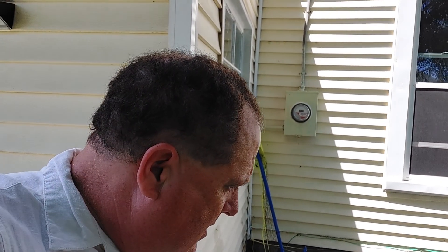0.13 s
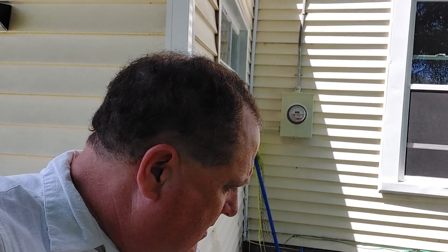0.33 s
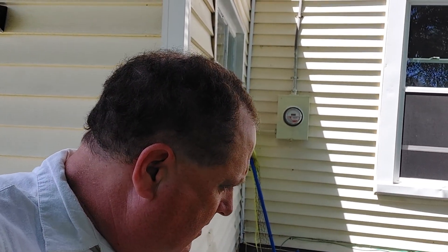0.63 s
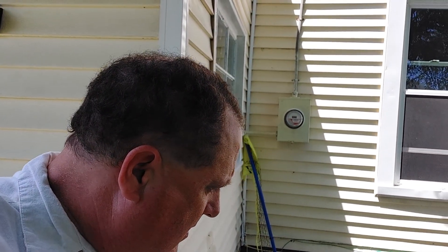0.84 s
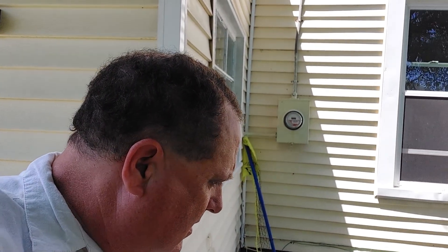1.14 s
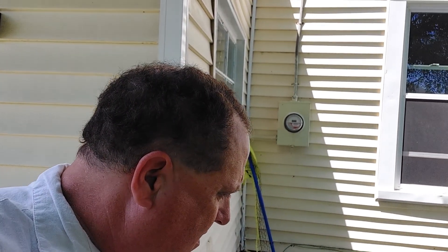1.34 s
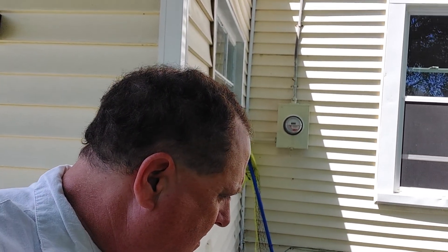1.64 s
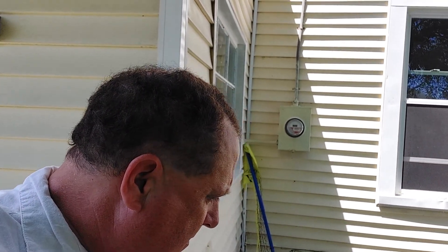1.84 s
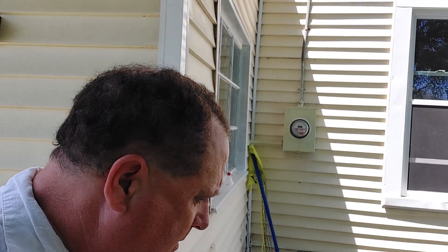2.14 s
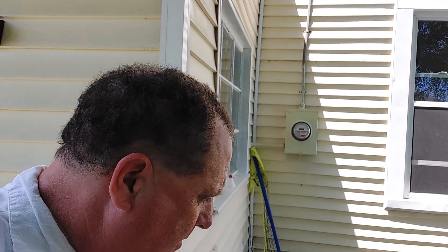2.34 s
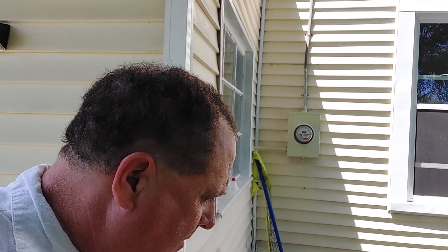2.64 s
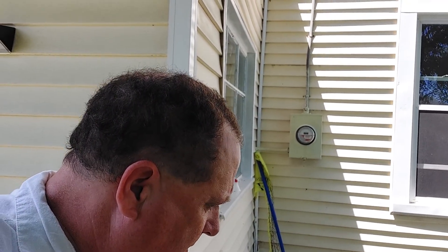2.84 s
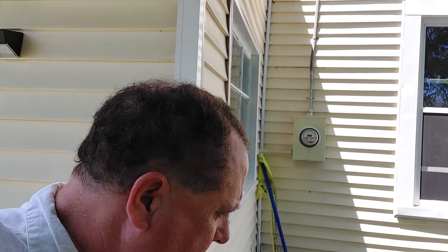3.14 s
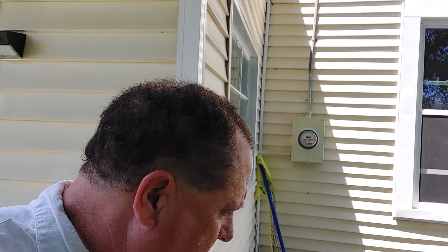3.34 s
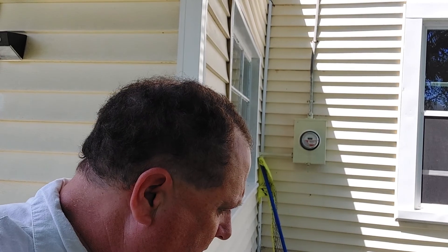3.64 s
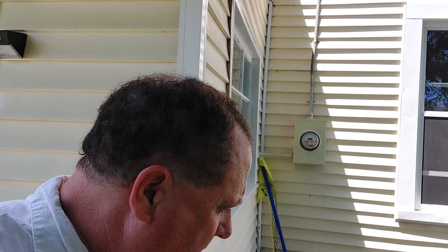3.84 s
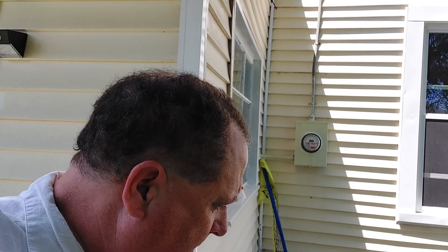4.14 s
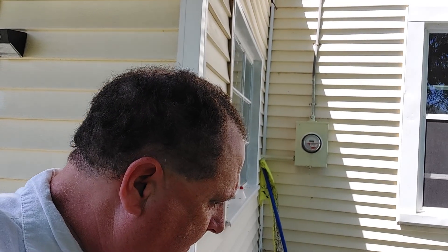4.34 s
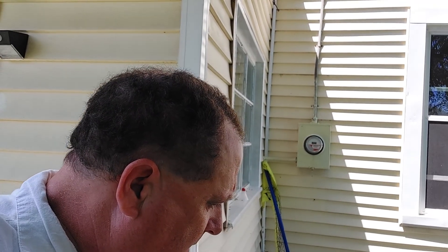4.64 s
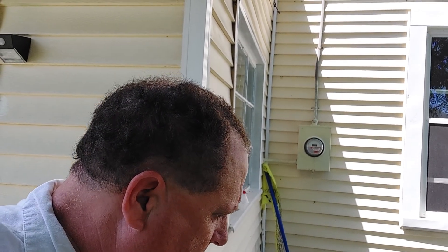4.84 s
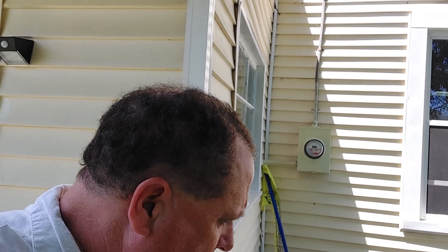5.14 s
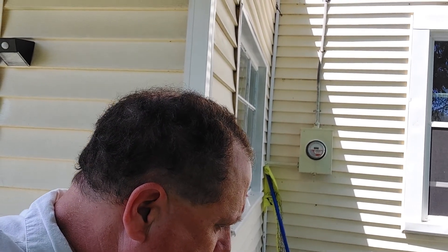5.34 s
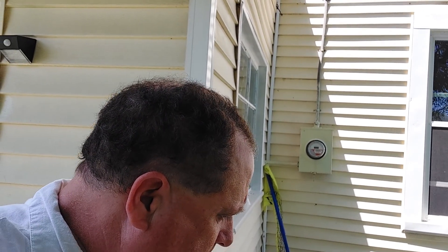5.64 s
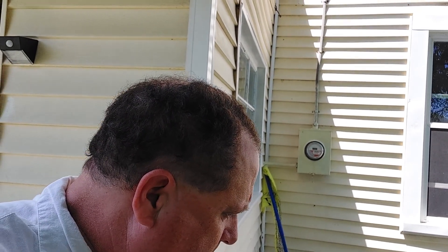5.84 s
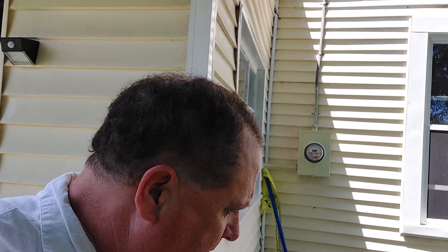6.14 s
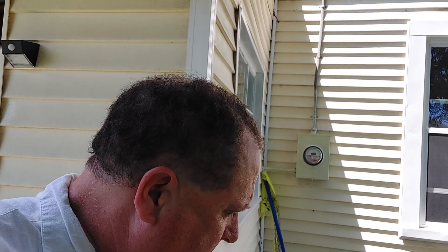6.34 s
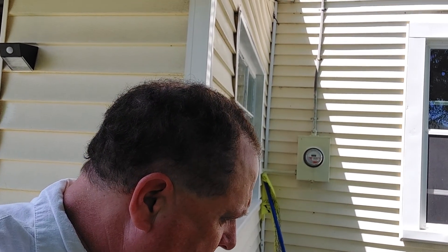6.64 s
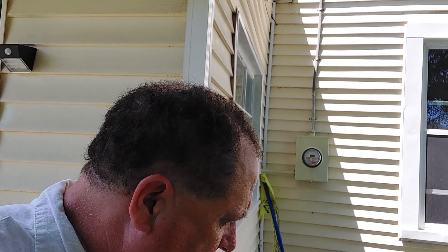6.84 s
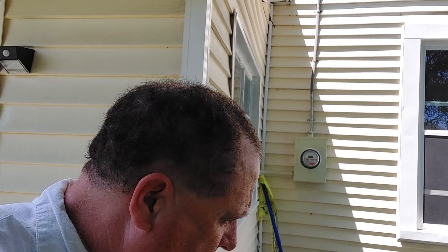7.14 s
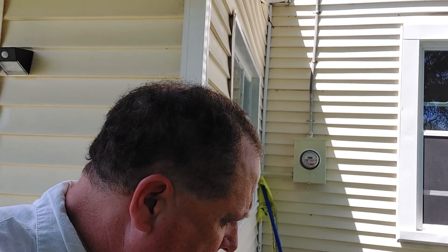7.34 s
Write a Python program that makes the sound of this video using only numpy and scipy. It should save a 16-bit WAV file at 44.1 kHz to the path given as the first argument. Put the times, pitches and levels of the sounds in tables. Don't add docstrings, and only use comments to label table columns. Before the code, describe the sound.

Close, bright stereo sound in a quiet yard. Weak fizz and tiny ticks come first, with a faint far bird chirp. Meat rubs and drags across foil, then boiling fat rushes up with dense hiss, sharp spits and watery pops. The hollow grill bowl knocks and rumbles beneath. The sizzle slowly thins but never stops, over a low wavering drone.

```python
import sys
import numpy as np
from scipy import signal
from scipy.fft import rfft, irfft, next_fast_len
from scipy.io import wavfile
from scipy.ndimage import uniform_filter1d

SR = 44100
rng = np.random.default_rng(int(sys.argv[2]) if len(sys.argv) > 2 else 0)


def wav_out(sig):
    wavfile.write(sys.argv[1], SR, np.round(np.clip(np.atleast_2d(sig).T, -1, 1) * 32767).astype(np.int16))


def decibels_to_gain(level_db):
    exponent = np.asarray(level_db, float) / 20
    return 10 ** exponent


N = 329868
LEFT_LAG = 6


def read(points, hz):
    f, value = np.transpose(points)
    return np.interp(np.log(hz + 1), np.log(f + 1), value)


def curve(rows, column=1):
    rows = np.asarray(rows)
    return np.interp(np.arange(N) / SR, rows[:, 0], rows[:, column])


def swells(rows):
    t = np.arange(N) / SR
    return sum(db * np.maximum(1 - abs(t - s) / max(half, .005), 0) for s, db, half in rows)


def evened(x):
    return x / np.sqrt(np.mean(x ** 2))


def add(mix, s, sound):
    part = mix[round(s * SR):][:len(sound)]
    part += sound[:len(part)]


def shaped(x, gain):
    size = next_fast_len(N)
    return irfft(rfft(x, size) * gain(np.fft.rfftfreq(size, 1 / SR)), size)[..., :N]


def low_cut(corner_hz, power):
    return lambda hz: 1 / np.sqrt(1 + (corner_hz / (hz + 1)) ** power)


def high_cut(corner_hz, power):
    return lambda hz: 1 / np.sqrt(1 + (hz / corner_hz) ** power)


def humps(modes, steep=0.98):
    return lambda hz: np.sqrt(sum(decibels_to_gain(db) ** 2 / (1 + (2 * (hz - f) / w) ** 2) ** steep for f, w, db in modes))


def patchy(patchy_db, wide, long):
    z = signal.stft(rng.standard_normal((2, N)), nperseg=256, noverlap=128)[2]
    patches = uniform_filter1d(rng.standard_normal(z.shape[1:]), wide, 0)
    patches = evened(uniform_filter1d(patches, long // 2, 1))
    noise = signal.istft(z * decibels_to_gain(patchy_db * patches), nperseg=256, noverlap=128)[1]
    return evened(noise[:, :N])


def bubbles(per_s, spread_db, t60_ms):
    size_db = spread_db * np.minimum(rng.exponential(1, N), 2.8)
    starts = decibels_to_gain(2 * size_db) * (rng.random(N) < per_s / SR)
    fade = decibels_to_gain(-120e3 / SR / t60_ms)
    swell = decibels_to_gain(-120e3 / SR / (0.69 * t60_ms))
    power = signal.lfilter([1], [1, -fade], starts)
    power = signal.lfilter([1], [1, -swell], power[::-1])[::-1]
    return power / power.mean()


# pitch_hz [Hz], level_db [dB per Hz]
YARD = [(88, -39), (150, -7), (235, 4), (292, -25), (362, -5), (387, -14), (1200, -20), (1730, -14.5),
        (8000, -43.5), (10400, -79), (17600, -120)]


def yard():
    air = shaped(rng.standard_normal((2, N)), lambda hz: decibels_to_gain(read(YARD, hz)))
    return decibels_to_gain(-53.5) * evened(air)


# time_s [s], level_db [dB]
DRONE = [(0, -44.5), (.25, -39), (.8, -38), (1.5, -37.5), (1.75, -40), (2.25, -34.5), (2.7, -41),
         (3.3, -37.5), (3.9, -35.5), (4.2, -38), (4.55, -42.5), (5.7, -41), (6.4, -45), (7.1, -45),
         (7.31, -51.5), (7.48, -43.5)]
# time_s [s], change_db [dB], half_length_s [s]
GUSTS = [(.62, 2, 0.046), (.82, 10, 0.024), (.98, -6, 0.039), (1.04, 4, 0.045), (1.15, 8.5, 0.041),
         (1.19, -5.5, 0.099), (1.46, 2.5, 0.068), (1.6, -3, 0.086), (1.67, 4.5, 0.034), (2.23, 1, 0.032),
         (2.32, -2, 0.043), (2.36, 6.5, 0.023), (2.48, -5, 0.04), (2.57, 0, 0.067), (5.95, 0, .12),
         (2.73, -3, 0.072), (2.89, 7.5, 0.053), (3.31, 5, 0.025), (3.46, -7.5, 0.078), (3.56, 4.5, 0.11),
         (3.64, -5, 0.067), (3.75, 3, 0.1), (3.81, -9, 0.035), (3.86, 7, 0.043), (3.92, -6, .03),
         (4.1, -10, 0.045), (4.75, -5, 0.13), (4.85, 5, 0.14), (5.33, -5, 0.06), (5.65, 6, 0.032),
         (6.17, 7.5, 0.092), (6.41, 6, 0.027)]
# pitch_hz [Hz], width_hz [Hz], level_db [dB]
HUMS = [(52.4, 10, -33), (68, 35, -1), (87.06, 1.5, 1), (122, 16, -5.5), (143.5, 3.8, -5.5)]


def drone():
    hums, rumble_cut = humps(HUMS, steep=1.4), low_cut(33, 4)
    noise = shaped(rng.standard_normal((2, N)), lambda hz: hums(hz) * rumble_cut(hz))
    return decibels_to_gain(curve(DRONE) + swells(GUSTS) + 0.5) * evened(noise)


# start_s [s], length_s [s], level_db [dB], start_hz [Hz], end_hz [Hz]
CHIRPS = [
    (0.086, .035, -59, 3140, 2950),
    (0.122, 0.046, -61, 2700, 2910),
    (1.345, .05, -58, 2650, 2800),
]


def bird():
    out = np.zeros(N)
    for s, length, db, start_hz, end_hz in CHIRPS:
        along = np.arange(0, 1, 1 / (length * SR))
        pitch_hz = start_hz + (end_hz - start_hz) * along
        whistle = np.sin(np.pi * along) * np.sin(2 * np.pi * np.cumsum(pitch_hz) / SR)
        add(out, s, decibels_to_gain(db) * whistle)
        add(out, s + 0.0167, decibels_to_gain(db - 4.0) * whistle)
    return out * decibels_to_gain([[1.5], [-1.5]])


# time_s [s], level_db [dB], ridge_hz [Hz]
SLIDE = [
    (.48, -84, 2000),
    (.6, -57.5, 2150),
    (.72, -55, 2470),
    (.85, -52.5, 2600),
    (.97, -62, 2470),
    (1.07, -54, 2400),
    (1.2, -85, 2400),
]


def slide():
    noise = patchy(1.8, wide=2, long=16)
    turn = np.exp(2j * np.pi * np.cumsum(curve(SLIDE, column=2)) / SR)
    keep = np.exp(-np.pi * 600 / SR)
    ridge = evened((turn * signal.lfilter([1], [1, -keep], noise / turn)).real)
    rustle = evened(shaped(noise, humps([(3330, 400, 4), (4750, 1800, -4)], steep=1.6)))
    both = decibels_to_gain(curve(SLIDE)) * (ridge + decibels_to_gain(-9.5) * rustle)
    return np.array([both[0], 0.37 * both[0] + 0.6 * both[1]])


# start_s [s], peak_db [dB], hold_s [s]
PULLS = [
    (1.069, -44.5, 0.051),
    (1.185, -49, 0.02),
    (1.28, -64, 0.14),
    (1.46, -61, .008),
]
PULL_RISE_S, PULL_FADE_DB_PER_S = 0.016, 193


def scrape():
    pulls, t = np.zeros(N), np.arange(SR // 2) / SR
    for s, db, hold in PULLS:
        fade_db = PULL_FADE_DB_PER_S * np.maximum(t - hold, 0)
        add(pulls, s, np.minimum(t / PULL_RISE_S, 1) * decibels_to_gain(db - fade_db))
    foil = shaped(patchy(2.3, wide=3, long=10), humps([(1105, 110, 16), (1940, 2500, 1.5), (4500, 4900, -18)]))
    grain = np.sqrt(3.3 + 0.8 * bubbles(230, 1.8, 24.0))
    return decibels_to_gain(-1.0) * pulls * evened(foil) * grain


# start_s [s], peak_db [dB], pitch_hz [Hz], t60_ms [ms]
KNOCKS = [(1.073, -43, 300, 50), (1.197, -34, 1960, 45), (1.212, -35, 1820, 45), (1.329, -32, 350, 43),
          (1.546, -35.5, 400, 61), (1.747, -28, 392, 37), (1.868, -31, 600, 32), (2.41, -27, 555, 100),
          (2.71, -28, 560, 60), (3.09, -25.5, 550, 80), (2.333, -29, 398, 65), (2.633, -29, 420, 54),
          (3.001, -35, 373, 43), (3.056, -28, 308, 73), (3.155, -27.5, 304, 120), (3.21, -31, 408, 250),
          (3.566, -24, 377, 26), (3.679, -30, 260, 57), (3.787, -21.5, 557, 57), (3.872, -31.5, 396, 37),
          (3.895, -23, 560, 73), (4.066, -28, 536, 39), (4.141, -27.5, 520, 49), (4.234, -30, 415, 32),
          (4.665, -23, 255, 47), (6.016, -32, 585, 52), (6.041, -30, 495, 34), (7.034, -30.5, 426, 43)]


def knocks():
    out, t = np.zeros(N), np.arange(6000) / SR
    for s, db, hz, t60 in KNOCKS:
        ring = np.sin(2 * np.pi * hz * t)
        ring = ring + .5 * np.sin(2 * np.pi * 883 * t) + 0.36 * np.sin(2 * np.pi * 390 * t)
        add(out, s, decibels_to_gain(db - 10.0 - 64000.0 * t / max(t60, 5)) * ring)
    return out


# time_s [s], level_db [dB]
STIR = [(0, -59.5), (1.02, -50.5), (1.3, -47), (1.5, -52), (2.12, -43), (3.0, -42.5), (3.6, -45.5),
        (4.0, -43.5), (4.5, -45), (5.2, -46.5), (7.0, -55), (7.17, -45), (7.35, -56.5), (7.48, -51)]
# time_s [s], change_db [dB], half_length_s [s]
JOSTLES = [(1.07, 5.5, 0.039), (1.42, 6, 0.03), (2.19, -5, 0.11), (2.265, 7, 0.035), (2.3, -10, 0.047),
           (2.42, 8.5, 0.092), (2.71, 4.5, 0.061), (3.08, 5.5, 0.12), (3.23, 7.5, 0.029), (3.42, -2, 0.028),
           (3.58, 8, 0.0063), (3.81, -7, 0.08), (4.61, -9.5, 0.085), (4.66, 8.5, 0.037), (5.25, 4.5, 0.087),
           (7.04, 8, 0.055), (7.15, -4, 0.04), (6.37, -6, 0.069), (6.93, -4, .05)]
# pitch_hz [Hz], width_hz [Hz], level_db [dB]
BOWL = [(246, 37, 1.5), (308, 51, -2.5), (400, 73, -2), (560, 61, -1), (883, 58, -7)]


def bowl():
    stir_db = curve(STIR) + swells(JOSTLES)
    stirring = patchy(3.06, wide=2, long=10) * np.sqrt(0.66 + 0.3 * bubbles(23, 0.92, 150.0))
    hollow = evened(shaped(stirring, humps(BOWL, steep=0.95)))
    rattle = evened(shaped(stirring, humps([(1170, 460, 0)], steep=4.3)))
    rattle_db = 2.7 * (stir_db + 40.5) - 59.5
    return decibels_to_gain(stir_db - 2.5) * hollow + decibels_to_gain(rattle_db) * rattle + knocks()


# start_s [s], peak_db [dB]
CRACKS = [(0.388, -21.5), (0.4094, -40), (1.2915, -31), (1.8677, -20), (2.0088, -18), (2.166, -17),
          (2.8853, -20), (2.981, -15), (3.3094, -21), (3.5149, -24), (3.9134, -21), (4.0682, -21),
          (4.3086, -21), (4.9651, -18), (4.98, -12), (5.0389, -18), (5.0854, -24), (5.1292, -21),
          (5.3672, -25), (5.4126, -19), (6.0417, -24), (6.112, -27), (6.1284, -23), (6.3949, -23),
          (6.6804, -27), (6.7416, -21), (6.8418, -23), (7.1367, -27), (7.1911, -22)]
CRACK_T60_MS, CRACK_DB, CRACK_LATE_S = 5.0, 3.0, 5e-4


def cracks():
    out, ms = np.zeros((N, 2)), np.arange(400) / SR * 1e3
    for s, db in CRACKS:
        tail = rng.standard_normal((400, 2)) * decibels_to_gain(-1.0 - 60 * ms / CRACK_T60_MS)[:, None]
        tail[8:12] += np.array([[1], [-1.6], [1.2], [-.5]])
        tail[:, 0] = np.roll(tail[:, 0], LEFT_LAG)
        add(out, s + CRACK_LATE_S, decibels_to_gain(db + CRACK_DB) * tail * decibels_to_gain([-1.5, 1.0]))
    return shaped(out.T, low_cut(13000, 3))


# start_s [s], peak_db [dB], pitch_hz [Hz]
POPS = [(1.569, -27, 1720), (1.6936, -33, 1600), (1.7474, -24, 1940), (1.8537, -32, 1990),
        (1.8677, -19, 1950), (1.9724, -19, 1940), (1.9959, -30, 1720), (2.0099, -27, 1700),
        (2.0617, -32, 1860), (2.0885, -16, 1880), (2.1445, -39, 1980), (2.157, -19, 1970),
        (2.6654, -31, 1620), (2.6654, -35, 1710), (2.8944, -22, 1700), (2.9293, -20, 1820),
        (2.9547, -40, 1740), (3.03, -14, 1790), (3.058, -22, 1660), (3.1493, -21, 1730),
        (3.2366, -18, 1650), (3.2887, -20, 1590), (3.3099, -20, 1680), (3.3568, -24, 1720),
        (3.4541, -20, 1660), (3.493, -19, 1660), (3.516, -19, 1760), (3.5668, -22, 1590),
        (3.613, -19.5, 1660), (3.6399, -21, 1770), (3.6811, -20, 1610), (3.8439, -21, 1680),
        (3.9372, -21, 1700), (3.9637, -19, 1730), (4.1024, -23, 1720), (4.4957, -24, 1710),
        (4.748, -26, 1690), (4.8848, -25, 1880), (4.9796, -35, 1930), (4.9921, -20, 1750),
        (5.0395, -29, 1660), (5.0869, -24, 1740), (5.1296, -21, 1750), (5.1607, -21, 1970),
        (5.1976, -22, 1760), (5.2255, -32, 1990), (5.3483, -36, 1590), (5.36, -23, 1760),
        (5.3787, -18, 2060), (5.411, -30, 1760), (5.456, -21, 1980), (5.5412, -20, 1710),
        (5.6602, -24, 1700), (5.7618, -34, 1630), (5.908, -38, 1980), (6.0417, -21, 1610),
        (6.112, -30, 1730), (6.7591, -36, 1900), (6.8244, -25, 1830), (7.3806, -26, 2100)]
POP_RISE_MS, POP_T60_MS = 0.32, 10.7
POP_GLIDE = 0.017


def pops():
    out, ms = np.zeros(N), np.arange(1500) / SR * 1e3
    shape = (1 - np.exp(-ms / POP_RISE_MS)) * decibels_to_gain(-60 * ms / POP_T60_MS)
    for s, db, hz in POPS:
        turns = hz * ms / 1e3 * (1 + POP_GLIDE * ms / 10)
        add(out, s, decibels_to_gain(db - 9.0) * shape * np.sin(2 * np.pi * turns))
    return out


def pings(count=2500):
    out = np.zeros((N, 2))
    for when, pitch, size, side in rng.random((count, 4)):
        turns = np.arange(300) / SR * 3200 * 4.7 ** pitch
        ping = np.sin(2 * np.pi * turns * (1 + 0.005 * turns)) * turns * np.exp(-turns / 2.3)
        loudness = decibels_to_gain(-4.0 * np.log(size + 0.2))
        add(out, when * N / SR, loudness * np.outer(ping, [1, 2 * side - 1]))
    return evened(out.T)


# start_s [s], peak_db [dB], coarse_db [dB relative to
BURSTS = [(0.0633, -43, -21), (0.086, -35, -25), (0.2882, -39, -11), (0.3521, -39, -23), (0.388, -28.5, -16),
          (0.4103, -41, -21), (0.4715, -33, -17), (0.6105, -35, -23), (0.687, -35.5, -12), (0.7577, -38, -6),
          (0.869, -43, 1), (1.0712, -39.5, 0.5), (1.103, -34, -15), (1.253, -42, 1), (1.2925, -29.5, -10),
          (1.297, -36, -12), (1.476, -40, -3), (1.401, -41, -6), (1.57, -43, -6), (6.165, -28, -5),
          (6.1715, -26, -10),
          (1.654, -22, -9), (1.66, -25, -13), (1.571, -27, -25), (1.712, -34, -10), (1.815, -30, -14),
         (1.8686, -18.5, -6.5), (2.0084, -19, -18), (2.167, -15.5, -27), (2.281, -23, -7),
         (2.885, -18, -29), (2.981, -21, -10.5), (3.03, -17.5, -6.5), (3.3104, -19, -18), (3.689, -20, -11),
         (3.843, -24.5, -3), (3.9133, -22, -16), (4.0687, -22, -12), (4.3095, -20, -9.5),
         (4.9801, -17, -17), (4.9923, -24, -3.5), (5.0404, -21.5, -7), (5.087, -25, -10),
         (5.0925, -27, -20), (5.129, -28, 6), (5.227, -21, -8.5), (5.3786, -21.5, -8.5),
         (5.4137, -23.5, -5), (5.761, -25, -6.5), (6.0422, -25, -23), (6.1115, -22.5, -5.5),
         (6.13, -27.5, -2), (6.3949, -26, -26), (6.6823, -23, -18), (6.742, -26, -26), (6.843, -27, -13),
         (7.192, -25, -7), (7.197, -25, -12), (1.5928, -28, -12), (1.6996, -25, -21), (1.772, -23, -5),
         (2.859, -28, -16), (3.515, -27, -14), (4.9652, -23, -30), (5.368, -23, -9), (5.385, -25, -10),
         (5.475, -26, -4), (5.496, -28, -3), (6.373, -24, -26), (6.76, -30, -5), (6.822, -31, -3),
         (6.845, -24, -20), (6.917, -40, -17), (6.9547, -38, -16), (7.0021, -30, -22), (7.137, -26.5, -9)]
BURST_RISE_MS, SPRAY_T60_MS = .5, 43


def spits():
    snap, fine, coarse = np.zeros(N), np.zeros(N), np.zeros(N)
    ms = np.arange(3000) / SR * 1e3
    burst = decibels_to_gain(6.5 - 120 * ms / 6.5) + decibels_to_gain(-13.0 - 120 * ms / SPRAY_T60_MS)
    burst = burst * np.minimum(ms / BURST_RISE_MS, 1) ** 2
    for s, db, coarse_db in BURSTS:
        add(snap, s + 4e-4, decibels_to_gain(db) * np.array([.6, -1.5, 1.2, -.3]))
        add(fine, s, decibels_to_gain(2 * (db - 3.5)) * burst)
        add(coarse, s, decibels_to_gain(2 * (db + coarse_db + 2.0)) * burst)
    return snap, fine, coarse


# time_s [s], fizz_db [dB], coarse_share_db [dB]
FRY = [(0, -57, -5), (.5, -57.5, -5), (1.02, -60, 5.5), (1.1, -56, -6), (1.49, -59.5, 4), (1.56, -45.5, 1),
       (1.7, -42, 1.5), (1.82, -37.5, -3.5), (1.9, -35.5, -1.5), (2.02, -33.5, -2), (2.27, -32.5, -4.5),
       (2.45, -35, -0.5), (2.65, -35, -2), (4.18, -37.5, -3), (4.48, -37, -3), (4.9, -39.5, -2),
       (5.85, -41, -1.5), (7.48, -45, -1)]
# time_s [s], change_db [dB], half_length_s [s]
FALTERS = [(1.34, -3, .04), (1.47, 5, .03), (1.6, 3, .015), (1.62, -1, .03), (1.665, 4, .015),
           (1.85, -10, .025), (2.27, 1, .04), (2.5, -3.5, 0.035), (2.54, 3, 0.046), (4.975, 3, 0.046),
           (5.0, -3, .015), (5.16, 2.5, 0.18), (6.1, -4, 0.017), (2.97, -3, .012), (3.42, -3, .05),
           (2.82, 2.5, .03), (5.92, -2, 0.056), (6.35, -1.5, 0.046), (6.445, -3, .02), (6.47, 3.5, .03),
           (6.53, 0, 0.027), (6.58, -1, .03), (6.74, 2.5, .06), (6.81, -2, .04), (6.87, -1, .04),
           (6.99, -6, 0.027), (7.015, 3, .015), (7.18, 2.5, 0.089)]


def sizzle():
    fizz_db = curve(FRY) + 1.31
    snap, fine, coarse = spits()
    crackle, sputter = bubbles(700, 12.0, 2.4), bubbles(120, 1.0, 88.0)
    gurgle = bubbles(140, 7.2, 24.0)
    fine_boil = 1.0 + 0.25 * crackle + 0.51 * sputter
    coarse_boil = 0.31 + 0.045 * crackle + 0.53 * sputter + 0.03 * gurgle
    fine = fine + decibels_to_gain(2 * (fizz_db + swells(FALTERS))) * fine_boil
    coarse = coarse + decibels_to_gain(2 * (fizz_db + curve(FRY, column=2))) * coarse_boil
    high = shaped(patchy(1.34, wide=12, long=14), low_cut(8000, 8))
    low = shaped(patchy(1.7, wide=1, long=24), high_cut(8000, 8))
    middle = shaped(low, lambda hz: 1 / (1 + (5800 / (hz + 1)) ** 8))
    low = low - np.clip((-34.5 - fizz_db) / 25, 0, .75) * middle
    spray = evened(high) * np.sqrt(fine) + evened(low) * np.sqrt(coarse)
    return spray + decibels_to_gain(fizz_db - 16.0) * pings() + decibels_to_gain(1.5) * snap + pops()


# pitch_hz [Hz], width_hz [Hz], change_db [dB]
TRAY = [(3197, 110, -1.5), (3540, 330, 2.5), (4710, 180, 1.5), (6260, 240, 0), (6680, 210, 1),
        (8300, 320, 0)]


def over_tray(fat):
    return shaped(fat, lambda hz: decibels_to_gain(sum(db / (1 + (2 * (hz - f) / w) ** 2) for f, w, db in TRAY)))


# pitch_hz [Hz], likeness [0 to 1]
SAME = [(30, 0.064), (140, 0.75), (300, 0.9), (600, 0.91), (1100, 0.63), (1700, 1), (2050, 0.77),
        (2450, 0.36), (2900, 0.26), (4300, 0.1), (5200, 0.085), (6000, 0.1), (6400, 0.51), (7500, 0.36),
        (8500, 0.14), (9200, 0.33), (10200, 0.08)]
# pitch_hz [Hz], turn_rad [radians]
FAR_TURN = [(2400, 2.9), (2950, 3.3), (3400, 5.2), (3800, 3.5), (4400, 3.6), (5500, 4.8), (6200, 3.1),
            (6900, 4.2), (7200, 8.2), (7800, 9.4), (8900, 10.3), (10700, 14.1)]
FAR_HZ = 2350


def ports(pair, size=LEFT_LAG):
    same = lambda hz: np.clip(read(SAME, hz), 0, 1)
    right = shaped(pair[0], same) + shaped(pair[1], lambda hz: np.sqrt(1 - same(hz) ** 2))
    late = lambda hz: np.exp(-1j * np.where(hz > FAR_HZ, read(FAR_TURN, hz), 2 * np.pi * hz / SR * size))
    return np.array([shaped(pair[0], late), right])


# pitch_hz [Hz], level_db [dB]
LEFT_PORT = [(700, -8.5), (1150, -8.5), (1400, -7), (1700, 5), (2050, 3), (2750, -4), (3600, -2.5),
             (4050, -3), (4800, 0), (6500, -3.5), (8400, -6), (10500, -0.5), (12600, -3), (14000, -15),
             (15700, -7)]
RIGHT_PORT = [(700, -10.5), (1200, -12.5), (1450, -5.5), (1700, 3), (2050, -2.5), (2600, -5.5), (3300, -3),
              (3650, -5.5), (4300, -2), (6000, -2), (6700, 1.8), (7000, 0), (7300, 0), (7750, -4.5),
              (8450, -7.5), (9500, -5), (12000, -0.5)]
# delay_ms [ms], level_db [dB]
ECHOES = [
    [(1.3, -62), (3.1, -24), (6.7, -16)],
    [(1.7, -50), (3.9, -50), (5.9, -27)],
]


def port_colour(pair):
    echo = lambda hz, taps: 1 + sum(decibels_to_gain(db - hz / 500) * np.exp(-2j * np.pi * hz * ms / 1e3) for ms, db in taps)
    notch = lambda hz: 1 - 0.68 / (1 + ((hz - 7060) / 200) ** 2)
    cut = low_cut(500, 4)
    left = shaped(pair[0], lambda hz: decibels_to_gain(read(LEFT_PORT, hz) + 4) * notch(hz) * cut(hz) * echo(hz, ECHOES[0]))
    right = shaped(pair[1], lambda hz: decibels_to_gain(read(RIGHT_PORT, hz) + 3.5) * cut(hz) * echo(hz, ECHOES[1]))
    return np.array([left, right])


def scene():
    frying = port_colour(ports(over_tray(sizzle()) + scrape()))
    low = ports(bowl(), size=0) * decibels_to_gain([[-.6], [.6]]) + ports(drone()) * decibels_to_gain([[-3.4], [2.8]])
    return frying + low + yard() + bird() + cracks() + slide()


def gate(x, below_db, duck_db):
    hz, _, z = signal.stft(x, SR, nperseg=2048, noverlap=1536)
    narrow = uniform_filter1d(uniform_filter1d(abs(z) ** 2, size=6, axis=1), size=3, axis=2)
    neighbours = uniform_filter1d(narrow, size=50, axis=1)
    in_reach = abs(hz[:, None] - 6000) < 3500
    shut = (narrow < decibels_to_gain(-2 * below_db) * neighbours) & in_reach
    return signal.istft(z * np.where(shut, decibels_to_gain(-duck_db), 1), nperseg=2048, noverlap=1536)[1][:, :N]


def band_limit(x):
    return signal.sosfilt(signal.butter(12, 16960, fs=SR, output="sos"), x)


def record(dry):
    turn = np.array([[1, 0.97], [1, -0.96]]) / np.sqrt(2)
    gated = turn @ gate(turn @ dry, below_db=3.3, duck_db=30)
    limited = shaped(gated, high_cut(15745, 1200))
    return band_limit(limited)


dry = scene()
out = record(dry)
wav_out(out)
```